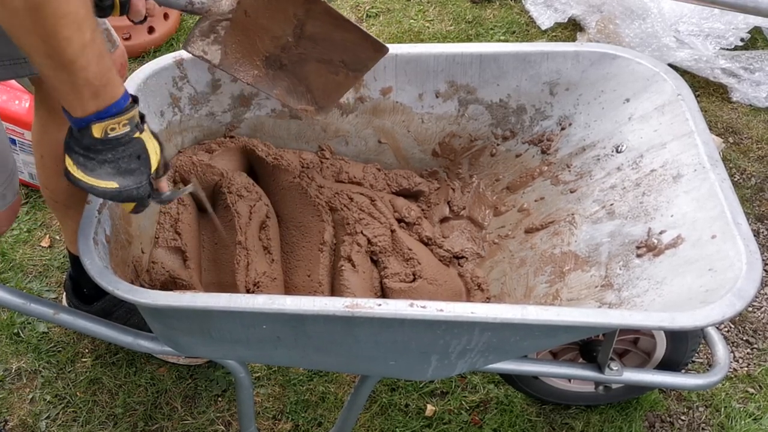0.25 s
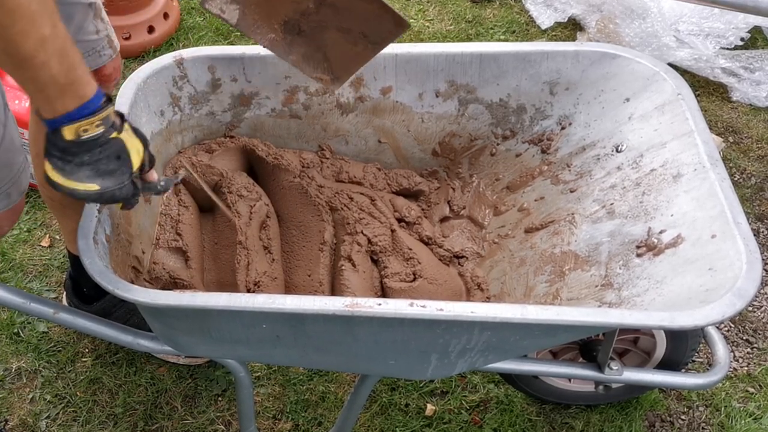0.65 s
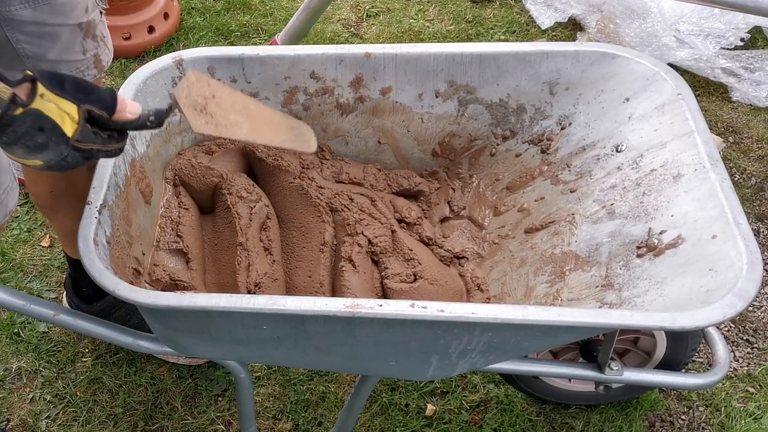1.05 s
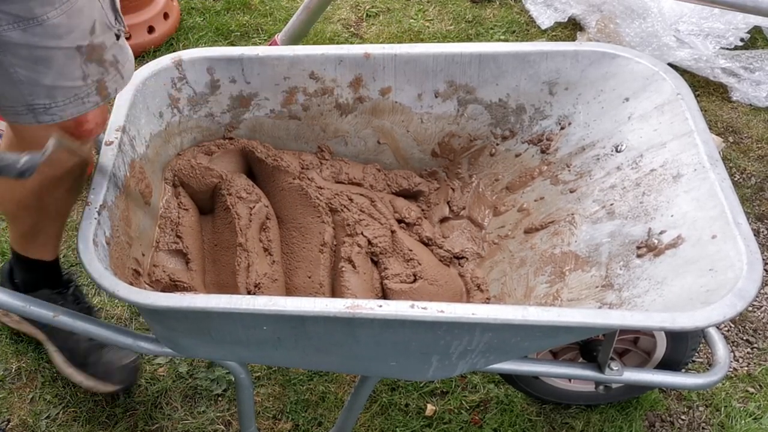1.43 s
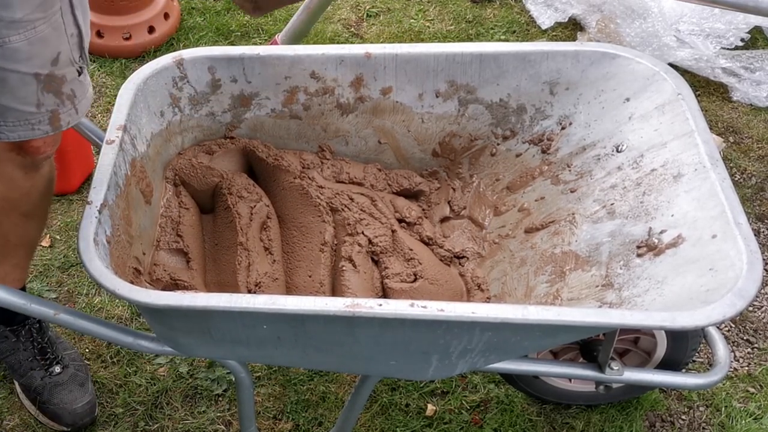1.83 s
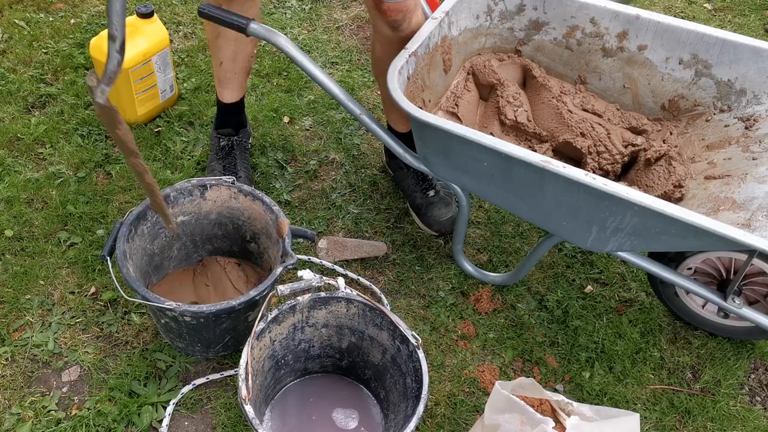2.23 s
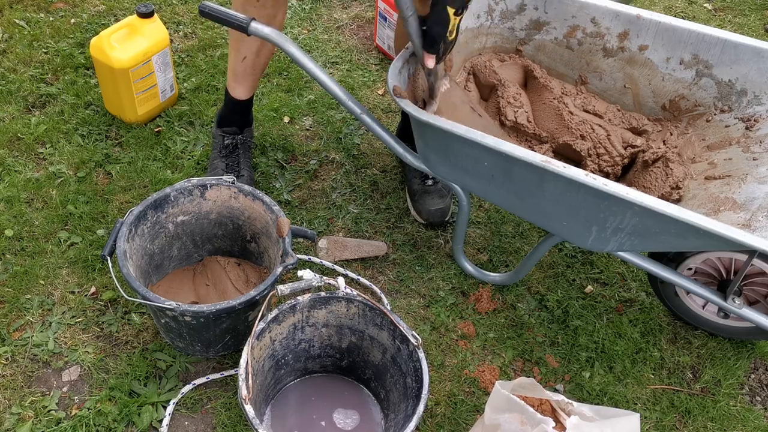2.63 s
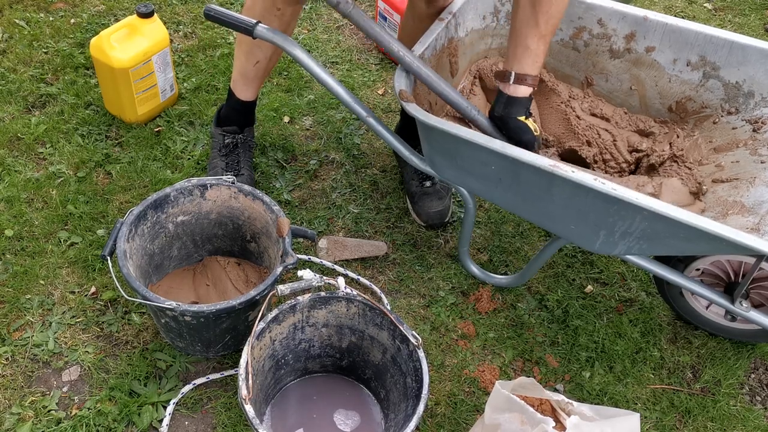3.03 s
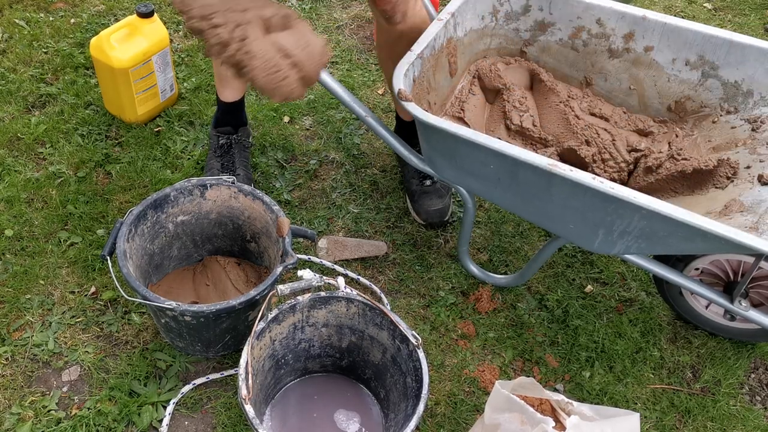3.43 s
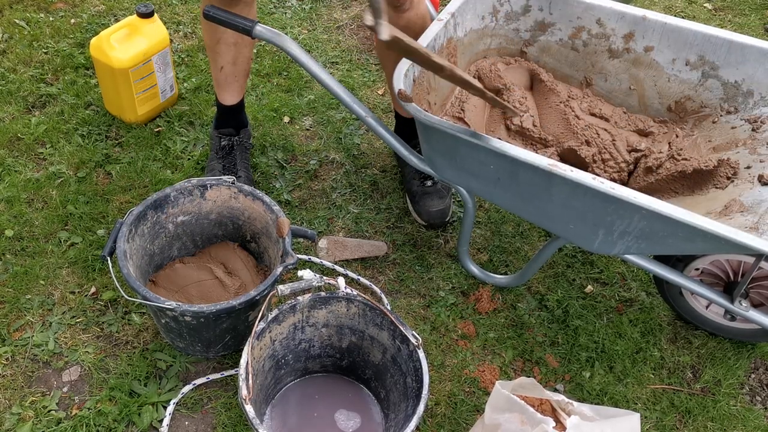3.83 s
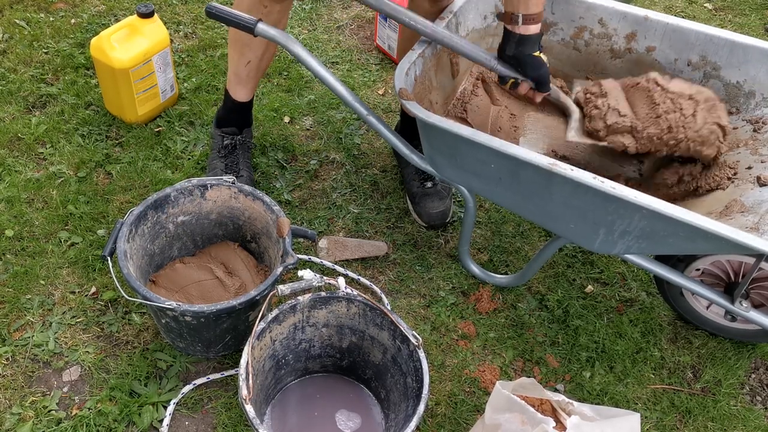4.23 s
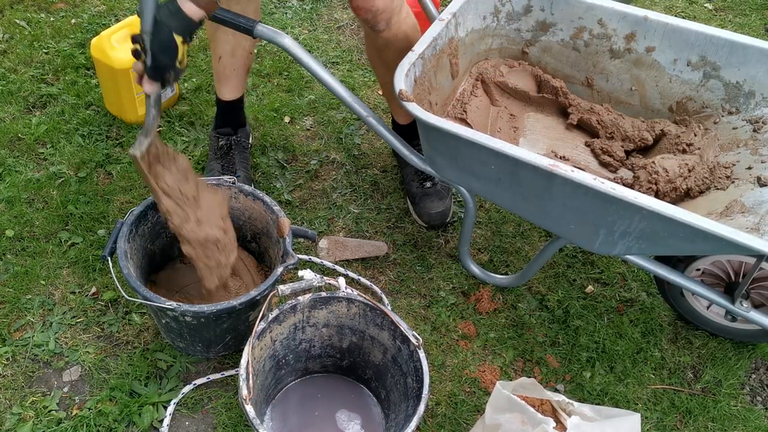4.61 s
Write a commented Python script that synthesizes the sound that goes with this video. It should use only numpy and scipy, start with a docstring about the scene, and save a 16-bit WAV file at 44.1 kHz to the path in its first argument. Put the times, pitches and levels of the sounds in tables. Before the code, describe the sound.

Five sharp, gritty trowel chops ring on a steel barrow, then quieter shovel scrapes and wet mortar slaps into a bucket outdoors.

```python
"""A trowel chops five times through wet mortar to a steel barrow tray: noise bursts clack, struck modes ring and boom.
A shovel then scrapes three loads along the gritty tray: grainy noise hisses and drives the sheet's resonances.
Mortar slaps into a bucket as shaped noise with hollow resonances, and loose crumbs patter as sparse grain.
Behind lie filtered-noise wind and rustle, a wavering hum and gliding-tone birds; a short noise tail answers as walls."""
import sys
import numpy as np
from scipy import signal
from scipy.fft import rfft, irfft, next_fast_len
from scipy.io import wavfile
from scipy.ndimage import map_coordinates

SR = 44100
rng = np.random.default_rng(int(sys.argv[2]) if len(sys.argv) > 2 else 0)


def transcribe(signal):
    """Save signal, clipped to [-1, 1], as a 16-bit WAV file at the path in sys.argv[1]."""
    frames = np.atleast_2d(signal).T
    limited = np.clip(frames, -1, 1)
    pcm = np.round(limited * 32767).astype(np.int16)
    wavfile.write(sys.argv[1], SR, pcm)


N = 214667
TIME = np.arange(N) / SR  # the whole scene, s
BURST_TIME = np.arange(SR // 3) / SR  # one short hit, s

# Spectra give the relative colour of a noise; event levels are taken before the trims set in the functions.
# Wind and rustle colour: freq_hz, density_db (per Hz)
WIND_COLOUR = [(15, -6.5), (35, -3.5), (65, 7.5), (100, -1.5), (150, -7), (250, -30.5), (600, -65)]
RUSTLE_COLOUR = [(88, -23.5), (150, -13), (172, -9.5), (238, -8.5), (416, -9), (477, -6), (1200, -7),
                 (3750, -26.5), (6940, -27.5), (8250, -47), (11700, -50.5), (15000, -64.5)]
# Their levels, the rustle's from SWITCH_S on: time_s, level_db
WIND_SWELL = [(0, -43.5), (.5, -41.5), (.62, -32.5), (.8, -33), (.95, -46), (1.1, -39), (1.4, -47.5),
              (2.03, -46.5), (2.15, -38), (2.26, -61.5), (2.9, -57.5), (4.87, -55.5)]
RUSTLE_SWELL = [(2.26, -65.5), (3.95, -65), (4.3, -61.5), (4.87, -61.5)]
# Level of the low hum: time_s, level_db
HUM_LEVEL = [(2.3, -69.5), (2.6, -40.5), (2.74, -57), (2.93, -43), (3.32, -64), (3.41, -42.5), (3.64, -44),
             (3.96, -56.5), (4.0, -40.5), (4.14, -80), (4.19, -60), (4.41, -78), (4.46, -52.5), (4.84, -70),
             (4.87, -80)]
# Nearer bird notes: start_s, length_s, start_pitch_hz, end_pitch_hz, level_db
BIRD_NOTES = [(1.131, 0.07, 4700, 4700, -64.5), (1.198, .4, 4780, 4470, -76),
              (2.1, 0.022, 6100, 5780, -62.5), (2.281, 0.076, 3800, 3740, -66),
              (2.438, 0.051, 3480, 3360, -68.5), (4.236, 0.032, 3650, 3560, -58),
              (4.781, 0.064, 7120, 7350, -69)]
# Wet lumps landing: start_s, splash_db, plop_db, t60_s
SLAP_EVENTS = [(2.194, -40.5, -31, 0.098), (2.219, -40, -46, .044), (2.825, -50.5, -78, 0.058),
               (2.927, -50, -59, 0.068), (3.656, -35.5, -39, 0.075), (3.688, -50, -81, .061),
               (4.37, -50, -50, 0.056), (4.707, -39, -52, 0.066), (4.727, -43.5, -54, 0.11)]
# Splash colour: freq_hz, density_db (per Hz)
SPLASH_COLOUR = [(400, -4.5), (1400, -20), (2100, 1), (3200, -3), (5000, -1.5), (6900, 1), (8300, -18.5),
                 (11000, -27), (15000, -26)]
# Hollow bucket resonances: pitch_hz, width_hz, level_db
BUCKET_PEAKS = [(322, 38, 7), (564, 48, 3), (800, 82, 5.5), (1385, 160, -3.5), (1810, 115, -0.5),
                (2820, 150, -4.5), (3670, 98, -11.5), (4950, 220, -21)]
# Colour of loose crumbs: freq_hz, density_db (per Hz)
CRUMB_COLOUR = [(1500, -25), (3000, -2.0), (4600, -10), (6900, 1.0), (8300, -15), (11000, -25), (15000, -29.5)]
# Shovel meeting tray: start_s, thud_db, knock_db, crushed_sand_db
THUD_EVENTS = [(2.597, -26, -26, -25.5), (2.762, -23, -22.5, -40), (3.012, -41, -33.5, -43.5),
               (3.989, -29, -36.5, -57), (4.188, -31.5, -28, -39), (4.239, -60, -41.5, -42)]
# Tray modes damped by the load: pitch_hz, level_db, t60_s
THUD_MODES = [(94.4, -9.5, 0.19), (135, -4, 0.1), (181, 1.5, 0.1), (213, 7, 0.098), (270.5, -7.5, 0.13),
              (332, -0.5, 0.076)]
# Knock colour: freq_hz, density_db (per Hz)
KNOCK_COLOUR = [(100, -1), (250, 2.5), (550, 2.5), (900, 1.5), (1600, -7.5), (3000, -12.5), (8000, -36)]
# Hollow under the advancing blade: start_s, end_s, start_pitch_hz, end_pitch_hz, level_db
HOLLOW_SWEEPS = [(2.675, 2.762, 1297, 561, -35), (4.064, 4.188, 1144, 516, -43.5)]
# Shovel pushes, two to a load: start_s, stop_s, hiss_db, body_db, growth_db (start to stop),
# arch_db (extra pressure halfway), release_t60_s
PUSHES = [(2.588, 2.685, -37, -40, 6, 1.5, 0.09), (2.694, 2.766, -35.5, -38.5, 5.5, 6, 0.074),
          (2.986, 3.077, -47, -45.5, 8, 4, 0.19), (3.104, 3.157, -45, -42.5, 17.5, 0, 0.065),
          (3.983, 4.133, -34.5, -37, 18, 2.5, 0.076), (4.141, 4.191, -32.5, -34.5, 3.5, 0, 0.093)]
# Scrape hiss and duller sheet rasp: freq_hz, density_db (per Hz)
HISS_COLOUR = [(1060, -24.5), (1800, -5), (1970, -2.5), (2140, -9.5), (2840, -2.5), (3230, -6),
               (3810, -5.5), (4370, -7), (6780, 2), (8360, -15.5), (10500, -27), (14600, -25.5),
               (15600, -33), (16000, -78)]
BODY_COLOUR = [(80, -25), (200, 2.5), (330, 2.5), (430, -2), (700, 5), (1500, 2), (2400, -17), (3500, -9),
               (7000, -42)]
# Shovel sheet pressed on the tray: pitch_hz, width_hz, level_db
SHEET_PEAKS = [(208, 53, 6), (532, 47, -6.5), (710, 42, -1.5), (797, 77, -6), (940, 86, -6.5),
               (1150, 31, -2), (1515, 37, 6), (2064, 22, 6.5), (2255, 43, 4), (2570, 41, 2),
               (2810, 74, -1.5), (3860, 39, 5)]
# Trowel blows: start_s, clack_db, grit_db, ring_db, centre_hz (favoured modes), spread_octaves,
# boom_db, boom_delay_s, boom_pitch_ratio, rebound_delay_s, rebound_db
BLOWS = [(.0098, -9.5, -15.5, -10.5, 680, .84, -9.5, 0.0023, 0.99, 0.0084, -26),
         (0.2223, -19.5, -15.5, -19.5, 1020, 1.77, -16, .0077, 1.025, 0.023, -22),
         (0.417, -18.5, -19.5, -18, 900, 1.17, -13.5, .0043, 1.026, .022, -24),
         (0.6234, -13.5, -17.5, -16.5, 1500, 1.6, -15, .01, .87, .028, -22.5),
         (0.8441, -10, -10, -16.5, 2000, 2, -13, .003, 0.98, 0.035, -24.5)]
# Steel tray and blade, then the loaded tray floor: pitch_hz, level_db, t60_s
STEEL_MODES = [(426, -7.5, 0.021), (567, -0.5, 0.11), (580, -1, 0.038), (777, -3.5, .12), (827, -8, 0.16),
               (913, -5, 0.19), (1027, -7, .08), (1130.6, -5.5, 0.15), (1230, -8.5, 0.032),
               (1340, -7, 0.049), (1465, -10.5, 0.055), (1620, -6.5, 0.085), (1883, -4.5, 0.15),
               (2120, -2.5, 0.06), (2310, -8, 0.054), (2400, -12.5, 0.13), (2663, -4.5, 0.21),
               (3130, -12.5, 0.13), (3450, -12.5, 0.12), (3620, -17, 0.15), (5130, -11.5, .08),
               (5370, -8.5, 0.06), (6900, -9, 0.094), (6850, -5, 0.099), (7400, -11, .1)]
BOOM_MODES = [(107, -18, 0.19), (165, -9, 0.069), (183, -7.5, 0.2), (216.2, 1, .16), (289, -9, .12),
              (316, -13, .13), (393.3, -14.5, 0.085)]
# Edge clack, breaking sand, and the dull shove into mortar: freq_hz, density_db (per Hz)
CLACK_COLOUR = [(150, -12), (400, -2), (700, -7.5), (1200, -6), (1800, -8.5), (2700, -7), (4000, -18),
                (8000, -45.5)]
GRIT_COLOUR = [(500, -14.5), (1500, -0.5), (3000, -2), (4400, -2), (5700, -1.5), (7100, -1.5),
               (8200, -15.5), (10000, -24), (15000, -26)]
SHOVE_COLOUR = [(70, -15.5), (170, 0), (330, 0), (550, -2), (900, -8.5), (2000, -27), (5000, -52)]
# Stereo likeness of close trowel, wide shovel and bucket, and early rustle: freq_hz, likeness (1 = mono)
NEAR_LIKENESS = [(200, 0.99), (1400, 1), (3100, 0.61), (6800, 0.34), (15000, 0.33)]
WIDE_LIKENESS = [(100, 0.4), (600, 0.014), (3000, 0.067)]
AHEAD_LIKENESS = [(150, .5), (400, 0.94), (1000, .93), (2000, .75), (4000, .1)]
# Decay of the yard: freq_hz, t60_s
YARD_DECAY = [(150, 0.084), (1000, 0.23), (3000, 0.24), (7000, 0.25), (14000, 0.21)]
# Microphone balance: freq_hz, left_minus_right_db
MIC_BALANCE = [(200, 1.3), (2400, 0), (4400, 1.5), (7000, -6), (15000, 1)]

SWITCH_S = 2.225  # from here the background drops: rustle quieter and wider, stray crumbs begin
RUSTLE_EARLY_DB = -54  # rustle before the change at SWITCH_S
FAR_BIRD_HZ, FAR_BIRD_S, FAR_BIRD_DB = 3670, 0.08, -79  # middle pitch, note length, level
SPATTER_DB = -24.5  # crumbs around a lump, relative to its splash_db
SPATTER_T60, SLIDE_T60 = 0.21, 0.16  # s: decay after landing, build-up as the lump slides off
TRICKLE_DB, TRICKLE_T60 = -35.5, 1.1  # sand after a push: relative to its hiss_db, time to run out (s)
STRAY_DB = -82.5  # crumbs while the shovel is carried
THUD_OFFSET_S = 0.00082  # time offset between left and right in the thuds, left later
BITE_S = 0.0098  # the blade takes hold over this time
BODY_FOLLOWS = 0.5  # dB of sheet rasp per dB of pressure change in the hiss
SKID_S, SKID_DB = 0.0069, -22.5  # the edge slips once just after every blow
TOP_HZ = 15600  # middle of the upper band limit


def amp(db):
    """Decibels to gain."""
    return 10 ** (np.asarray(db) / 20)


def unit(x):
    """Scale to rms 1."""
    return x / np.sqrt(np.mean(x ** 2) + 1e-20)


def along(points, hz):
    """Read (Hz, value) points on a log-frequency axis."""
    f, v = np.transpose(points)
    return np.interp(np.log(hz + 1), np.log(f + 1), v)


def curve(points):
    """Read (s, value) points at every sample."""
    return np.interp(TIME, *np.transpose(points))


def fade(t60):
    """A hit's decay of 60 dB in t60 seconds."""
    return np.exp(-np.log(1000) * BURST_TIME / t60)


def dying(start, t60):
    """Full gain up to start, then a fall of 60 dB in t60 seconds."""
    return np.exp(-np.log(1000) * np.maximum(TIME - start, 0) / t60)


def rise(seconds):
    """A soft attack for a hit."""
    return 1 - np.exp(-(BURST_TIME / seconds) ** 2)


def wobble(rate, size=N):
    """A smooth random curve with rate knots a second."""
    knots = rng.standard_normal(int(size * rate / SR) + 4)
    return map_coordinates(knots, [np.arange(size) * rate / SR])


def filtered(x, response):
    """Apply a response of frequency, padded so that tails do not wrap round."""
    size = x.shape[-1]
    padded = next_fast_len(size + 8192)
    spectrum = rfft(x, padded) * response(np.fft.rfftfreq(padded, 1 / SR))
    return irfft(spectrum, padded)[..., :size]


def noise(spectrum, alike, size=len(BURST_TIME), grain=1):
    """Coloured stereo noise of rms 1; grain is the force that excites it."""
    def colour(hz):
        turn = np.arccos(np.clip(along(alike, hz), -1, 1)) / 2  # shares power between mid and side
        return amp(along(spectrum, hz)) * np.array([np.cos(turn), np.sin(turn)])
    mid, side = filtered(grain * rng.standard_normal((2, size)), colour)
    return unit(np.array([mid + side, mid - side]))


def sand(spread_db, rate, size=len(BURST_TIME)):
    """The uneven force of sand grains that catch and break."""
    return amp(spread_db * wobble(rate, size))


def resonant(force, peaks):
    """A rough force sets resonances ringing; stereo, rms 1."""
    def body(f):
        total = 0
        for k, (hz, width, db) in enumerate(peaks):
            peak = 1j * f * width / (hz * hz - f * f + 1j * f * width)
            total = total + (-1) ** k * amp(db) * peak
        return total
    return unit(filtered(force * rng.standard_normal((2, len(force))), body))


def ring(modes, scatter_db, pitch=1, weight=np.ones_like):
    """Decaying modes struck at new strengths; weight is each one's share at the point of impact."""
    hz, db, t60 = np.transpose(modes)[:, :, None]
    gain = amp(db + scatter_db * rng.standard_normal(hz.shape)) * weight(hz)
    sign = (-1) ** np.arange(len(hz))[:, None]
    detune = 1 + 0.0028 * rng.standard_normal(hz.shape)  # each mode slightly detuned at random on every call
    tones = np.sin(2 * np.pi * hz * pitch * detune * BURST_TIME)
    return np.sum(sign * gain * fade(t60) * tones, axis=0)


def add(track, s, sound):
    """Mix a sound into the track at time s."""
    start = max(round(s * SR), 0)
    track[:, start:start + sound.shape[-1]] += sound[..., :N - start]


def garden(hum_hz=60):
    """Wind rumbles on the microphone, far leaves and traffic rustle, with a wavering low hum."""
    wind = amp(curve(WIND_SWELL) + 1.2 * wobble(12)) * noise(WIND_COLOUR, [(60, 0.3)], N)
    before = amp(RUSTLE_EARLY_DB) * noise(RUSTLE_COLOUR, AHEAD_LIKENESS, N)
    after = amp(curve(RUSTLE_SWELL)) * noise(RUSTLE_COLOUR, WIDE_LIKENESS, N)
    rustle = amp(0.8 * wobble(12)) * np.where(TIME < SWITCH_S, before, after)
    phase = 2 * np.pi * np.cumsum(hum_hz + 1.2 * wobble(7.3)) / SR
    hum = amp(curve(HUM_LEVEL) - 1.5) * np.sqrt(2) * np.sin(phase)
    return wind + rustle + hum


def yard(x):
    """Walls and fences return a short diffuse tail, decaying at its own pace in each band."""
    hz, t, bands = signal.stft(rng.standard_normal((2, SR // 2)), SR, nperseg=256)
    decay = np.exp(-np.log(1000) * t / along(YARD_DECAY, hz)[:, None])
    tail = signal.istft(bands * decay, SR, nperseg=256)[1]
    tail = tail[:, :len(BURST_TIME)] * rise(0.02)
    return signal.fftconvolve(x, tail / np.linalg.norm(tail[0]), axes=1)[:, :N]


def far_notes(count):
    """Short gliding notes of a farther bird at random times, as rows like those of BIRD_NOTES."""
    notes = []
    for when, *ends in rng.random((count, 3)):
        start_hz, end_hz = FAR_BIRD_HZ * (1 + 0.15 * (np.array(ends) - 0.5))
        notes.append((TIME[-1] * when, FAR_BIRD_S, start_hz, end_hz, FAR_BIRD_DB))
    return notes


def birds():
    """Thin far whistles: gliding sines with a quick unsteady warble."""
    out = np.zeros((2, N))
    for s, length, start_hz, end_hz, db in BIRD_NOTES + far_notes(count=5):
        size = round(length * SR)
        hz = np.linspace(start_hz, end_hz, size) * (1 + 0.02 * wobble(337, size))
        whistle = np.sin(2 * np.pi * np.cumsum(hz) / SR)
        add(out, s, amp(db) * np.hanning(size) * whistle)
    return out


def crumbs():
    """Loose sand patters off the shovel after every push and around every lump that lands."""
    flow = amp(STRAY_DB) * (TIME > SWITCH_S)
    for start, stop, hiss_db, *_ in PUSHES:
        flow = flow + amp(hiss_db + TRICKLE_DB) * (TIME > stop) * dying(stop, TRICKLE_T60)
    for s, splash_db, *_ in SLAP_EVENTS:
        sliding = np.exp(np.log(1000) * np.minimum(TIME - s, 0) / SLIDE_T60)
        flow = flow + amp(splash_db + SPATTER_DB) * sliding * dying(s, SPATTER_T60)
    grain = sand(spread_db=3.5, rate=1500, size=N) * sand(spread_db=5, rate=45, size=N)
    return flow * noise(CRUMB_COLOUR, WIDE_LIKENESS, N, grain)


def slaps():
    """Wet mortar lands: one crackling force drives a noisy splash and the bucket's hollow plop."""
    out = np.zeros((2, N))
    for s, splash_db, plop_db, t60 in SLAP_EVENTS:
        grain = sand(spread_db=3, rate=900)
        splash = amp(splash_db) * noise(SPLASH_COLOUR, WIDE_LIKENESS, grain=grain)
        plop = amp(plop_db) * resonant(grain, BUCKET_PEAKS)
        add(out, s, amp(5.0) * rise(0.0058) * fade(t60) * (splash + plop))
    return out


def thuds():
    """The shovel bumps the tray around its pushes, crushing the sand beneath it."""
    out = np.zeros((2, N))
    for s, thud_db, knock_db, sand_db in THUD_EVENTS:
        thud = amp(thud_db) * np.array([ring(THUD_MODES, scatter_db=2) for ear in range(2)])
        knock = amp(knock_db + 5) * fade(0.087) * noise(KNOCK_COLOUR, WIDE_LIKENESS)
        crush = amp(sand_db) * fade(0.11) * noise(HISS_COLOUR, WIDE_LIKENESS)
        add(out, s, rise(0.0031) * (thud + knock + crush))

    def ear_offset(hz):  # half the offset delays the left, half advances the right
        return np.exp(-2j * np.pi * np.outer([0.5, -0.5], hz) * THUD_OFFSET_S)
    return filtered(out, ear_offset)


def hollows(width_hz=260):
    """The gap under the blade rings with the rasp, falling in pitch as the shovel slides in."""
    out = np.zeros((2, N))
    for start, end, start_hz, end_hz, db in HOLLOW_SWEEPS:
        size = round((end - start) * SR)
        phase = 2 * np.pi * np.cumsum(np.geomspace(start_hz, end_hz, size)) / SR
        ears = []
        for ear in range(2):  # random sine and cosine parts make a narrow band of noise
            sine_part = wobble(2 * width_hz, size) * np.sin(phase)
            ears.append(sine_part + wobble(2 * width_hz, size) * np.cos(phase))
        add(out, start, amp(db) * signal.windows.tukey(size) * unit(np.array(ears)))
    return out


def scrapes():
    """Sand grinds between shovel and tray: grainy hiss over the sheet's rasp, swelling as the load builds."""
    hiss, body = np.zeros((2, N))
    for start, stop, hiss_db, body_db, growth_db, arch_db, t60 in PUSHES:
        way = np.clip((TIME - start) / (stop - start), 0, 1)
        pressure_db = growth_db * (way - 0.5) + arch_db * np.sin(np.pi * way)
        contact = np.clip((TIME - start) / BITE_S, 0, 1) * dying(stop, t60)
        hiss += contact * amp(hiss_db + pressure_db)
        body += contact * amp(body_db + BODY_FOLLOWS * pressure_db)
    grain = sand(spread_db=3, rate=2400, size=N) * sand(spread_db=1, rate=130, size=N)
    clumps = sand(spread_db=2, rate=90, size=N)
    dull = amp(-4) * noise(BODY_COLOUR, WIDE_LIKENESS, N, grain)
    rasp = dull + amp(-1.0) * resonant(grain, SHEET_PEAKS)
    grind = amp(2.5) * hiss * noise(HISS_COLOUR, WIDE_LIKENESS, N, grain)
    return grind + body * clumps * rasp


def trowel():
    """The edge hits steel through sand; the heavy tray floor swings a moment later."""
    out = np.zeros((2, N))
    for (s, clack_db, grit_db, ring_db, centre_hz, octaves,
         boom_db, delay, pitch, rebound_s, rebound_db) in BLOWS:
        def favoured(hz):  # each point of impact favours its own range of modes
            return 1 / (1 + (np.log2((hz + 1) / centre_hz) / octaves) ** 2)
        crunch = amp(grit_db - 22.5) * rise(0.0019) * fade(0.024) * noise(GRIT_COLOUR, NEAR_LIKENESS)
        add(out, s - 0.002, crunch)  # sand gives way just before the edge lands
        clack = amp(clack_db) * fade(0.047) * unit(filtered(noise(CLACK_COLOUR, NEAR_LIKENESS), favoured))
        grain = sand(spread_db=6.0, rate=610)
        grit = amp(grit_db) * fade(0.04) * noise(GRIT_COLOUR, NEAR_LIKENESS, grain=grain)
        steel = amp(ring_db - 7.0) * rise(0.0014) * ring(STEEL_MODES, scatter_db=3.5, weight=favoured)
        add(out, s, clack + grit + steel)
        shove = amp(-5.5) * fade(0.12) * noise(SHOVE_COLOUR, NEAR_LIKENESS)
        boom = ring(BOOM_MODES, scatter_db=1.0, pitch=pitch) + shove
        add(out, s + delay, amp(boom_db) * rise(0.0048) * boom)
        for after, db in [(SKID_S, SKID_DB), (rebound_s, rebound_db)]:  # the blade skids, then bounces
            grain = sand(spread_db=1.5, rate=800)
            scuff = amp(db) * rise(0.001) * fade(0.04) * noise(GRIT_COLOUR, NEAR_LIKENESS, grain=grain)
            add(out, s + after, scuff)
    return out


def scene():
    """Close trowel, farther shovel and bucket, birds beyond, all in the same yard."""
    background, song = garden(), birds()
    shovel = crumbs() + slaps() + thuds() + hollows() + scrapes()
    chops = trowel()
    echo = yard(amp(-16) * chops + amp(-34) * shovel + amp(-0.5) * song)
    return background + song + shovel + chops + echo


def record(dry):
    """Two microphones, the right one brighter around 7 kHz; nothing is kept above the band limit."""
    def response(hz):
        band = np.clip((TOP_HZ - hz) / 600 + 0.5, 0, 1)
        return amp(np.outer([0.5, -0.5], along(MIC_BALANCE, hz))) * band
    return filtered(dry, response)


dry = scene()
out = record(dry)
transcribe(out)
```